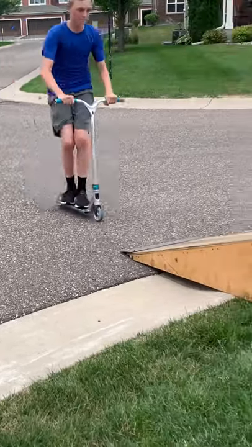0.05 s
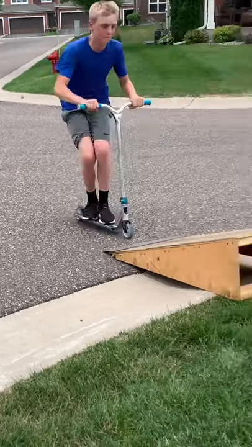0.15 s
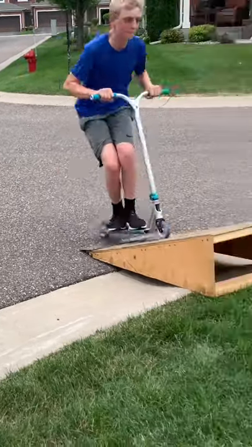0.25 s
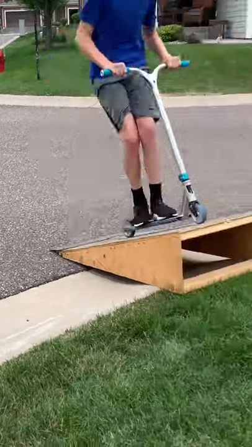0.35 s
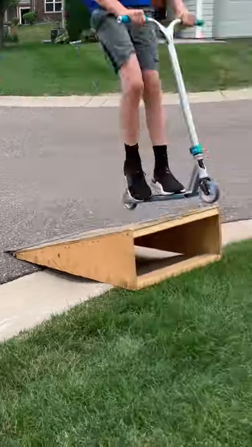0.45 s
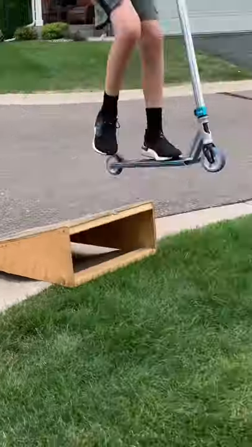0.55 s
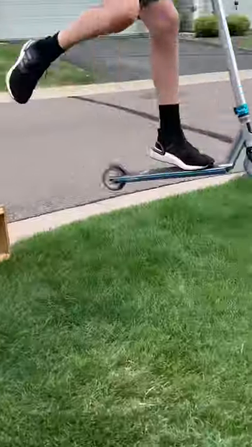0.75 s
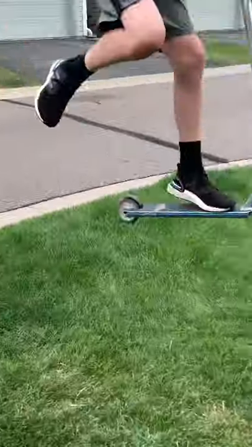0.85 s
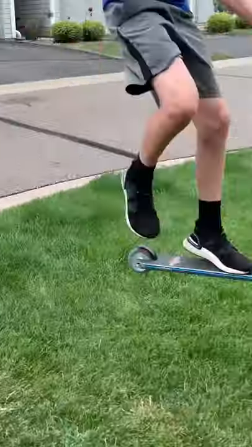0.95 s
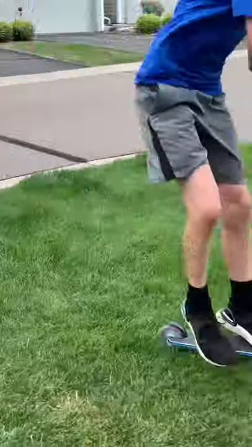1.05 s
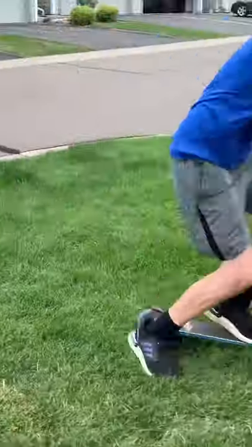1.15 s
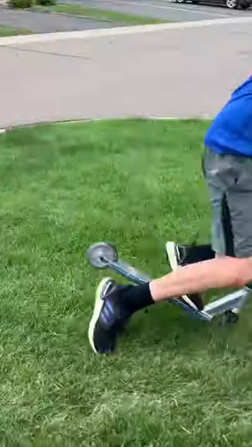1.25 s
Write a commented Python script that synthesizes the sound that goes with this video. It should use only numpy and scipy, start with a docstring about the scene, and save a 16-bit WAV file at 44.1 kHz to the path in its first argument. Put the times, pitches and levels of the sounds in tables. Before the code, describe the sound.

A kick scooter rolls, clatters over a hollow wooden ramp and thuds onto grass.

```python
"""Kick scooter off a plywood ramp

Wheels rumble over asphalt and clack onto a hollow ramp, which booms and thumps on after take-off.
Spinning wheels keep the frame ringing; the scooter lands on a lawn with a swish, a rattle and two
thuds. Close up and outdoors, with light wind and a faint answer from the houses."""
import sys
import numpy as np
from scipy import signal
from scipy.fft import rfft, irfft, next_fast_len
from scipy.io import wavfile
from scipy.ndimage import map_coordinates

SR = 44100
rng = np.random.default_rng(int(sys.argv[2]) if len(sys.argv) > 2 else 0)


def digitize_waveform(pressure):
    """Quantize a signal to 16-bit integers and store it at the path in sys.argv[1].

    Rows of a 2-D input are taken as channels; values are limited to [-1, 1].
    """
    field = np.atleast_2d(pressure).T
    bounded = np.clip(field, -1, 1)
    quanta = np.round(bounded * 32767).astype(np.int16)
    wavfile.write(sys.argv[1], SR, quanta)


N = 57330

# The outdoor bed. Each row: time in seconds, street hush in dB, wind in dB.
BED_FADER = [(0, -49.5, -50.5), (.2, -45.5, -40.5), (.5, -45.5, -34), (.8, -47.5, -39), (.92, -48.5, -46.5),
             (1.03, -45, -38.5), (1.15, -51.5, -43), (1.22, -53.5, -48), (1.3, -55.5, -44)]
# Wheel rumble and frame whirr. Each row: time in seconds, level in dB.
ROLL_FADER = [(0, -43), (.12, -44), (.2, -35.5), (.25, -25.5), (.38, -28), (.44, -34), (0.501, -42.5),
              (.62, -83)]
WHIRR_FADER = [(0, -63), (.2, -65), (.43, -55), (.56, -57.5), (.635, -59), (.66, -48), (.69, -57.5),
               (.8, -48.5), (.89, -63), (1.03, -56), (1.3, -58.5)]
# The tone of each noise layer. Each row: frequency in Hz, relative level in dB.
HUSH_COLOUR = [(120, -20), (200, -0.5), (400, -1), (500, -5), (620, -0.5), (830, -5), (1000, -15),
               (1200, -9.5), (2000, -14), (3000, -19), (4500, -17), (6300, -33), (8600, -24), (11000, -76),
               (15500, -49)]
WIND_COLOUR = [(20, -25), (38, -7.5), (55, -1.5), (100, -4.5), (170, -16.5), (300, -31.5), (800, -90)]
ROLL_COLOUR = [(40, -19), (90, 8.5), (200, 3.5), (300, -3), (375, 5), (480, -10), (650, -8), (900, -5),
               (1060, -24), (1220, -6), (1800, -49), (3000, -24.5), (3700, -19), (6000, -42), (15000, -47)]
CLACK_COLOUR = [(200, -14), (400, -9.5), (520, -10.5), (750, -5), (950, -8.5), (1100, -25), (1300, -7),
                (1600, -10), (1820, -23), (2350, -12.5), (2800, -23), (3200, -21.5), (3600, -10),
                (4600, -12), (5500, -29.5), (6000, -20.5), (7300, -27), (8800, -19.5), (10400, -21.5),
                (11500, -41), (12700, -23.5), (14000, -24), (15600, -38)]
SPIN_COLOUR = [(500, -15), (1500, -1), (2500, 4.5), (4500, -0.5), (6500, -2), (9500, 0), (11000, -6),
               (11800, -44), (14000, -10), (16000, -30)]
GRASS_COLOUR = [(100, 5.5), (330, 9), (500, -8), (900, -7), (2000, -15), (4500, -11), (6500, -18.5),
                (9500, -7.5), (11700, -24), (14000, -9), (16000, -8.5)]
RATTLE_COLOUR = [(250, -28), (550, -16), (780, 1), (950, 5), (1100, -9.5), (1700, -13.5), (2300, -5.5),
                 (3300, -26), (4000, -10.5), (4900, -14.5), (5800, -22.5), (9500, -16), (11700, -23),
                 (14200, -11), (15600, -22)]
# The metal frame, whirring and struck. Each row: pitch in Hz, width in Hz, relative level in dB.
WHIRR_MODES = [(1164, 31, 3.5), (1338, 28, 7), (2479, 110, 5), (3464, 29, 3), (3840, 54, -4), (4740, 33, 0),
               (8360, 57, -7)]
FRAME_MODES = [(690, 150, 0), (1324, 130, -20), (2410, 75, 5.5), (2854, 27, 5.5), (3695, 130, -5),
               (4440, 71, -27), (4630, 38, -7), (5650, 14, -5.5), (6650, 69, -9), (8330, 36, -6.5),
               (8450, 63, -3), (9300, 62, -22)]
# Wheels and deck hit the ramp. Each row: start in seconds, clack level in dB, chatter length in
# seconds, treble tilt in dB per octave, plywood knock in dB.
RAMP_HITS = [(0.2155, -12.5, 0.0088, -0.5, -8), (0.266, -22.5, 0.0048, -3.5, -33),
             (0.2782, -26.5, 0.0038, 1.5, -33), (0.3093, -13.5, .013, 0.85, -8.5),
             (.3535, -16.5, 0.0019, 1.8, -15.5), (0.424, -37.5, 0.0084, 1, -30)]
# The plywood's ring. Each row: pitch in Hz, level relative to the knock in dB, t60 in seconds.
PLYWOOD_MODES = [(325.2, -1, 0.038), (364.8, 1.5, 0.022), (373.3, -20.5, 0.41), (223.3, -10, 0.17),
                 (739.5, -15.5, 0.047), (844.6, -21, 0.13), (1209, -20.5, 0.13), (1435, -24, 0.2)]
# The ramp flexes and rocks; wheels and deck thud into the lawn.
# Each row: start in seconds, pitch in Hz, level in dB, rise in seconds, t60 in seconds.
RAMP_BOOMS = [(0.218, 112, -18, .006, 0.079), (0.249, 160.4, -8, 0.018, 0.082),
              (.268, 296.5, -7, 0.0078, 0.046), (0.277, 82.6, -10, 0.013, .07),
              (0.353, 123, -16.5, 0.0027, 0.064), (0.399, 141.7, -24.5, 0.014, 0.34),
              (.512, 160.8, -21, 0.015, 0.18), (.52, 285, -29, 0.0091, 0.12), (.612, 142, -24, 0.016, .08),
              (0.637, 77, -21, 0.011, 0.03), (0.667, 169.4, -38.5, 0.0051, 0.57),
              (.772, 62.6, -25, 0.012, 0.29)]
LAWN_THUDS = [(1.115, 118, -18, 0.0082, 0.11), (1.11, 296, -16.5, 0.0053, 0.026),
              (1.111, 856, -19.5, 0.0014, 0.025), (1.189, 199, -20, 0.0038, 0.015),
              (1.19, 290, -38, 0.0084, 0.092)]
# The scooter rattles on landing.
# Each row: start in seconds, level in dB, chatter length in seconds, treble tilt in dB per octave.
RATTLES = [(1.1116, -20.5, 0.0019, -2), (1.123, -40, 0.0035, 6), (1.1835, -36.5, 0.0037, 0)]
# The tail from the houses. Each row: frequency in Hz, t60 in seconds.
STREET_DECAY = [(150, 0.71), (1000, 0.37), (4000, 0.24), (9000, 0.43), (15000, 0.25)]
# Stereo width. Each row: frequency in Hz, side gain in dB.
WIDTH = [(60, -14.5), (250, -22), (500, -11.5), (1000, -10), (2000, -2.5), (12000, -2.5)]
# The microphone's two ports. Each row: frequency in Hz, left over right in dB.
BALANCE = [(60, 3), (200, -3.5), (500, -.5), (1000, 1), (2000, 1), (4000, -1), (12000, 0)]

CLACK_RISE_S, BUZZ_T60_S = 0.00051, 0.17
FRAME_DB, METAL_DB = -13.5, -5  # frame tone and metallic smear within a clack
SCATTER_DB, STREET_DB = -7, -16
LOW_CUT_HZ, TOP_HZ = 36, 15800


def amp(db):
    """Decibels to gain."""
    return 10 ** (np.asarray(db) / 20)


def unit(x):
    """Scale to rms 1."""
    return x / np.sqrt(np.mean(x ** 2) + 1e-20)


def along(points, hz):
    """Read a curve of (Hz, value) points on a log axis."""
    freqs, values = np.transpose(points)
    return np.interp(np.log(hz + 1), np.log(freqs + 1), values)


def since(start):
    """Seconds since the start, zero before it."""
    return np.maximum(np.arange(N) / SR - start, 0)


def envelope(start, rise, hold, t60):
    """Smooth attack, hold and exponential release, all in seconds."""
    attack = np.sin(np.pi / 2 * np.minimum(since(start) / rise, 1)) ** 2
    return attack * np.exp(-np.log(1000) * since(start + rise + hold) / t60)


def wobble(rate):
    """A smooth random curve, rate knots a second."""
    return map_coordinates(rng.standard_normal(int(N * rate / SR) + 4), [since(0) * rate])


def fader(times, levels_db, flutter_db, rate):
    """A gain ride with random flutter on top."""
    return amp(np.interp(since(0), times, levels_db) + flutter_db * wobble(rate))


def filtered(x, response):
    """Shape x with a frequency response."""
    size = next_fast_len(N + SR // 2)
    return irfft(rfft(x, size) * response(np.fft.rfftfreq(size, 1 / SR)), size)[..., :N]


def noise(colour, tilt_db=0):
    """Coloured noise of rms 1, tilted per octave."""
    white = rng.standard_normal(N)
    return unit(filtered(white, lambda hz: amp(along(colour, hz) + tilt_db * np.log2(hz + 1))))


def resonate(x, modes):
    """Play x through a bank of resonances."""
    return filtered(x, lambda hz: sum(amp(db) * 1j * hz * width / (pitch**2 - hz**2 + 1j * hz * width)
                                      for pitch, width, db in modes))


def smear(x, t60):
    """Play x through a short, dense random ring of unit energy."""
    ring = rng.standard_normal(SR // 8) * np.exp(-np.log(1000) * since(0)[:SR // 8] / t60)
    return signal.fftconvolve(x, ring / np.linalg.norm(ring))[:N]


def stereo(mid, side):
    """Left and right: nearly mono in the bass, wide in the treble."""
    side = filtered(side, lambda hz: amp(along(WIDTH, hz)))
    return np.array([mid + side, mid - side])


def diffuse(colour):
    """Noise that comes from all around."""
    return stereo(noise(colour), noise(colour))


def outdoors():
    """A bed of soft street hush and lumps of wind."""
    times, hush_db, wind_db = np.transpose(BED_FADER)
    hush = fader(times, hush_db, flutter_db=1, rate=59.76) * diffuse(HUSH_COLOUR)
    wind = fader(times, wind_db, flutter_db=2.5, rate=13.6) * diffuse(WIND_COLOUR)
    return hush + wind


def rolling():
    """Wheels grind over asphalt, louder on the plywood, and die away in the air."""
    return fader(*np.transpose(ROLL_FADER), flutter_db=2.3, rate=120) * diffuse(ROLL_COLOUR)


def whirr():
    """The spinning wheels keep the metal frame faintly ringing, and hiss at take-off."""
    level = fader(*np.transpose(WHIRR_FADER), flutter_db=2.5, rate=44.74)
    ringing = level * unit(resonate(rng.standard_normal(N), WHIRR_MODES))
    hiss = amp(-46) * envelope(start=0.42, rise=0.03, hold=0.024, t60=0.31) * noise(SPIN_COLOUR)
    return ringing + hiss


def clack(start, db, length, tilt_db, colour, t60, buzz_db):
    """Hard parts chatter for a few milliseconds, then buzz out through the frame's resonances."""
    hit = envelope(start, CLACK_RISE_S, length, t60)
    buzz = amp(buzz_db) * envelope(start, CLACK_RISE_S, length, BUZZ_T60_S)
    shape = (hit + buzz) * unit(amp(3.1 * wobble(700)))
    crack = shape * noise(colour, tilt_db)
    frame = resonate(shape * rng.standard_normal(N), FRAME_MODES)
    chatter = crack + amp(FRAME_DB) * crack.std() * unit(frame)
    metal = amp(METAL_DB) * smear(chatter, t60=0.018)
    return amp(db) * chatter.std() * unit(chatter + metal)


def thump(start, hz, db, rise, t60, hold=0):
    """A panel or the ground swings at one pitch and dies away."""
    return amp(db) * envelope(start, rise, hold, t60) * np.sin(2 * np.pi * hz * since(start))


def ramp():
    """Each hit clacks and knocks the plywood; the box booms under the rider and rocks afterwards."""
    out = sum(thump(*boom) for boom in RAMP_BOOMS)
    for start, db, length, tilt_db, knock_db in RAMP_HITS:
        out += clack(start, db, length, tilt_db, CLACK_COLOUR, t60=0.046, buzz_db=-28.5)
        knock_start = start + 0.000994
        for hz, mode_db, t60 in PLYWOOD_MODES:
            pitch = hz * (1 + rng.normal(0, 0.0072))
            level_db = knock_db + mode_db + rng.normal(0, 1)
            out += thump(knock_start, pitch, level_db, rise=0.0099, t60=t60, hold=0.0031)
    return out


def landing():
    """Wheels swish and plough through grass and thud into the soil; the lawn damps the rattle."""
    touchdown = dict(start=1.0686, rise=0.032, hold=0.022)
    brush = envelope(**touchdown, t60=0.12)
    plough = amp(-10.5) * envelope(**touchdown, t60=0.99)
    blades = amp(2 * wobble(600))
    swish = amp(-37.5) * (brush + plough) * blades * noise(GRASS_COLOUR)
    thuds = sum(thump(*thud) for thud in LAWN_THUDS)
    rattle = sum(clack(*hit, RATTLE_COLOUR, t60=0.012, buzz_db=-17) for hit in RATTLES)
    return swish + thuds + rattle


def scooter():
    """The close-up layers, with fresh chatter on every call."""
    return ramp() + landing() + whirr()


def street(x):
    """A diffuse answer from the houses; the bass hangs on longest."""
    hz, t, spectrum = signal.stft(rng.standard_normal((2, SR // 2)), SR, nperseg=256)
    decay = np.exp(-np.log(1000) * t / along(STREET_DECAY, hz)[:, None])
    tail = signal.istft(spectrum * decay, SR, nperseg=256)[1]
    mid, side = signal.fftconvolve(x[None], tail / np.linalg.norm(tail[0]), axes=1)[:, :N]
    return stereo(mid, side)


def scene():
    """The mix: close sounds reach the microphone's two ports with differing phase and fine chatter."""
    near = scooter()
    scatter = amp(SCATTER_DB) * scooter()
    side = filtered(near + scatter, lambda hz: 1j)  # a quarter-cycle phase shift
    return stereo(near, side) + amp(STREET_DB) * street(near) + rolling() + outdoors()


def record(dry):
    """The ports differ a little in colour; deep bass is cut, peaks are rounded, the top is shaved."""
    x = filtered(dry, lambda hz: amp(along(BALANCE, hz) * np.array([[1], [-1]]) / 2))
    x = signal.sosfilt(signal.butter(3, LOW_CUT_HZ, "high", fs=SR, output="sos"), x)
    x = x / (1 + x ** 6) ** (1 / 6)  # soft clip
    return filtered(x, lambda hz: 1 / (1 + (hz / TOP_HZ) ** 120))


dry = scene()
out = record(dry)
digitize_waveform(out)
```